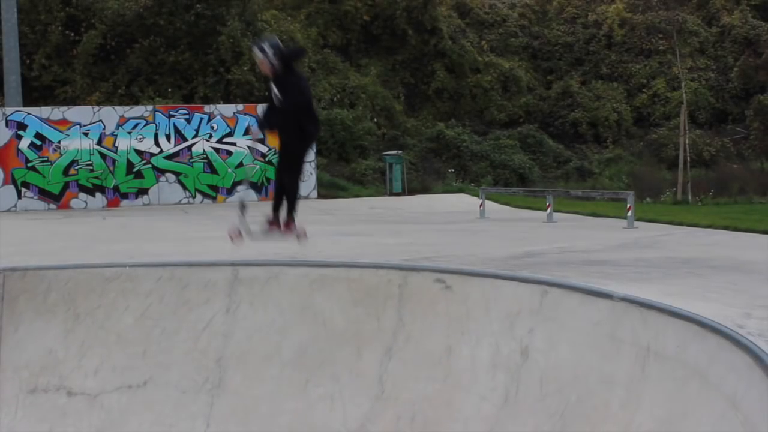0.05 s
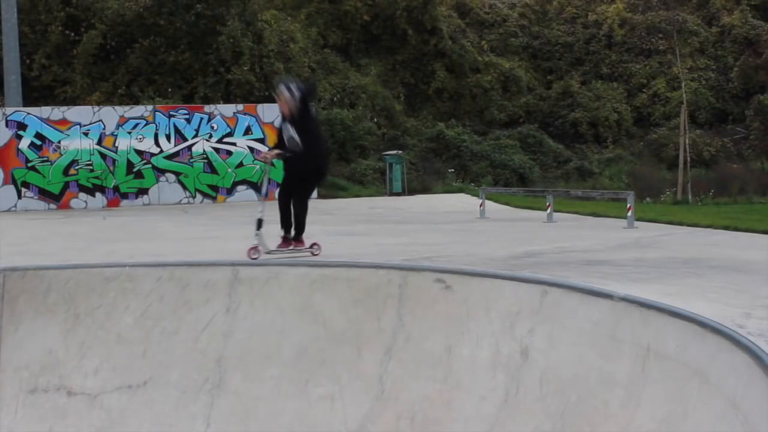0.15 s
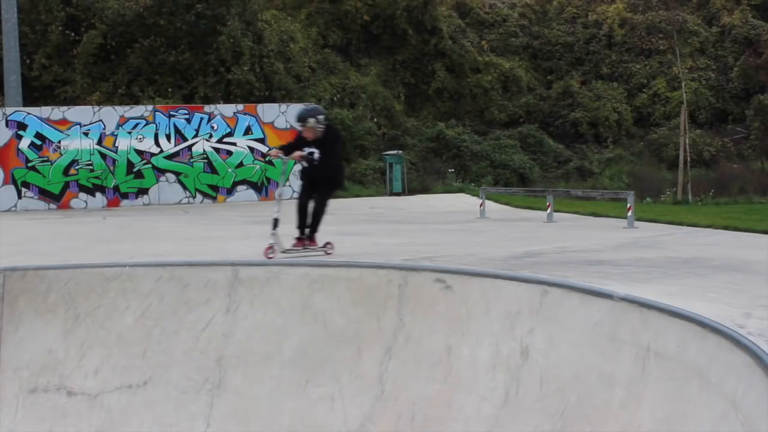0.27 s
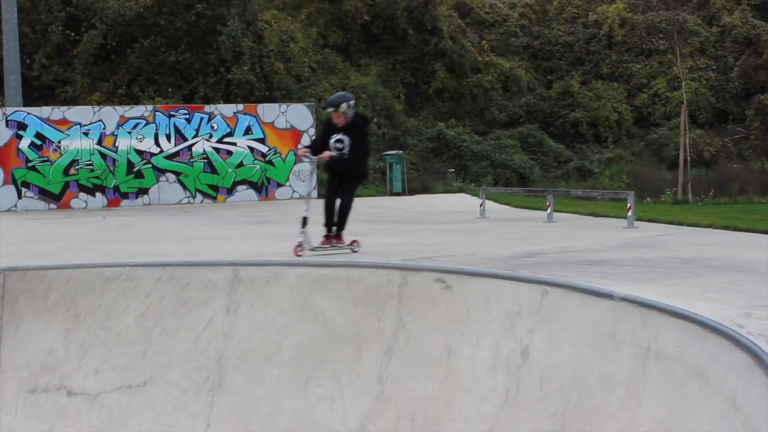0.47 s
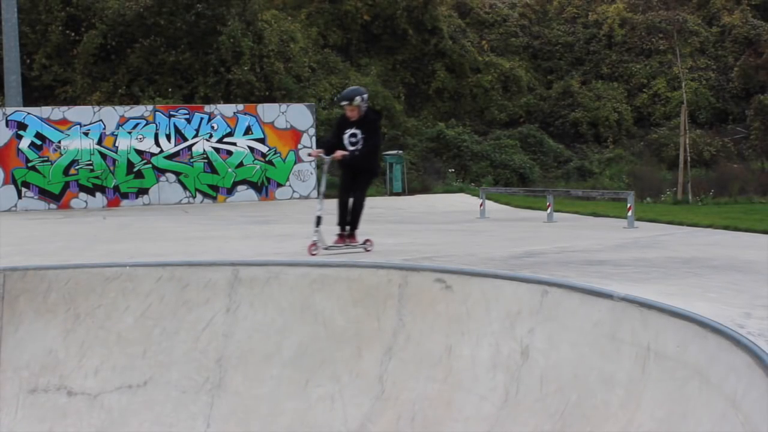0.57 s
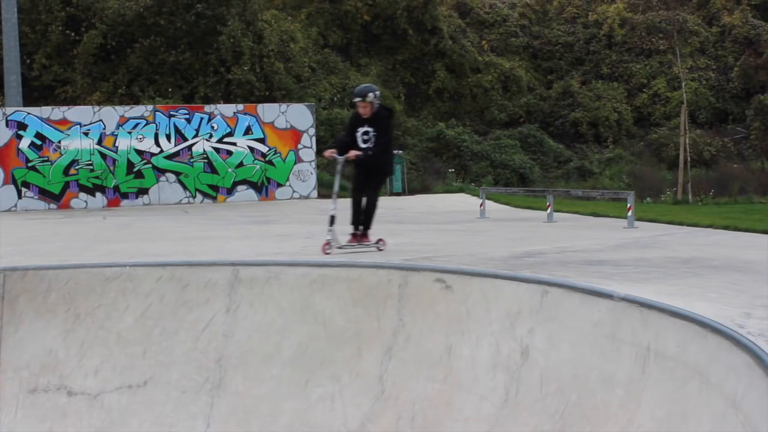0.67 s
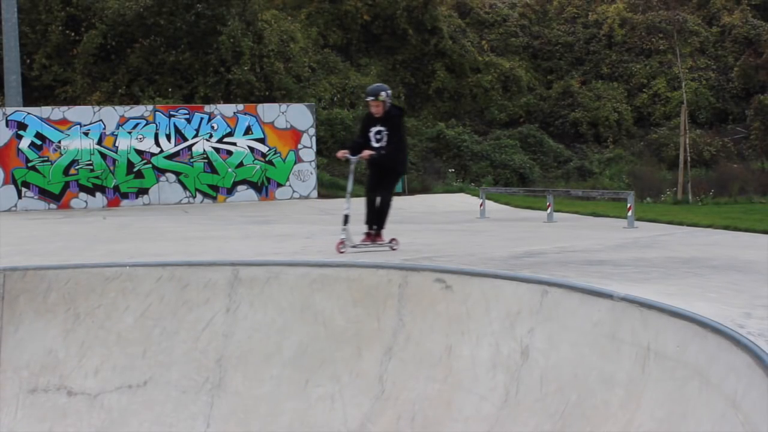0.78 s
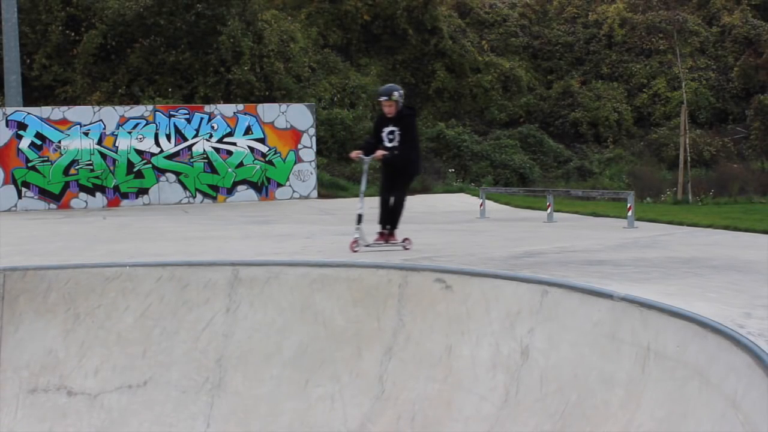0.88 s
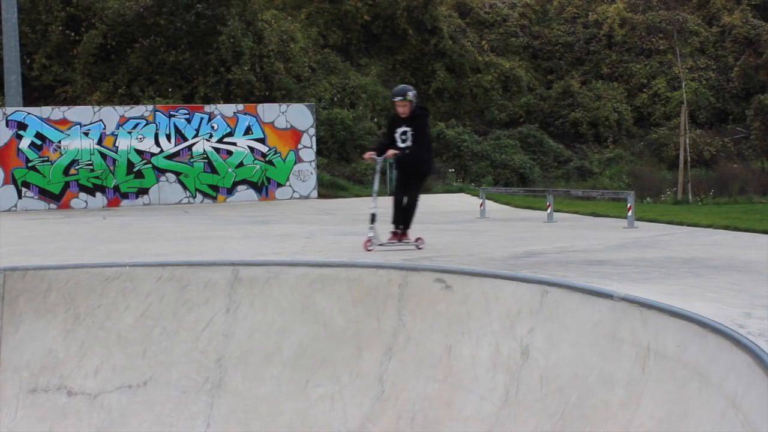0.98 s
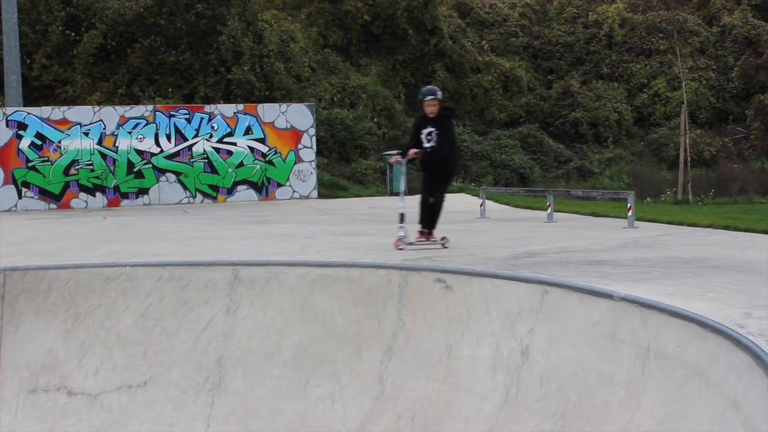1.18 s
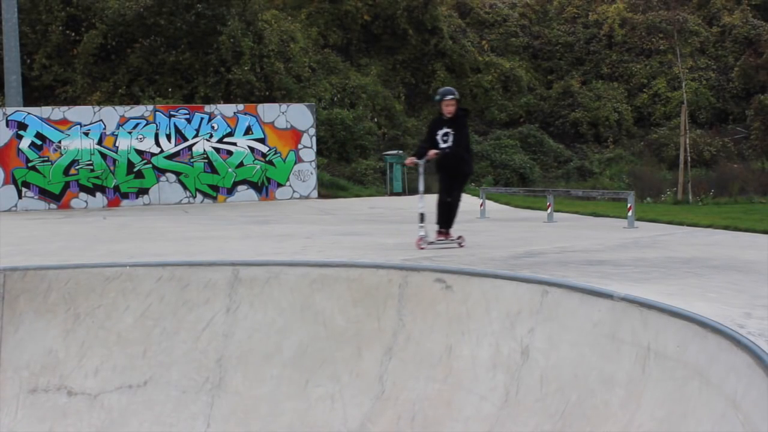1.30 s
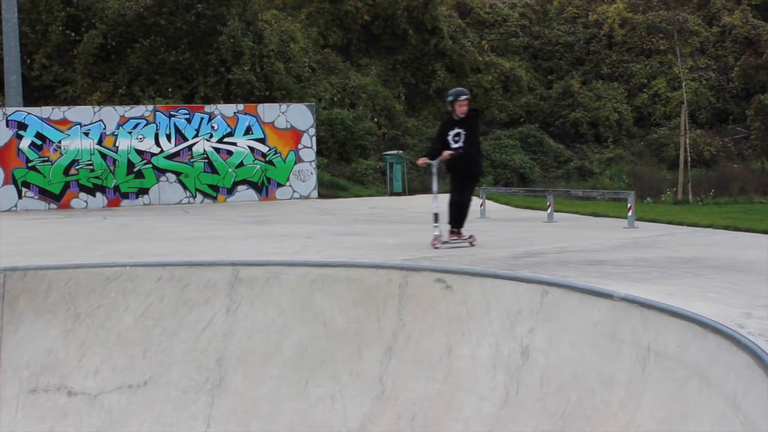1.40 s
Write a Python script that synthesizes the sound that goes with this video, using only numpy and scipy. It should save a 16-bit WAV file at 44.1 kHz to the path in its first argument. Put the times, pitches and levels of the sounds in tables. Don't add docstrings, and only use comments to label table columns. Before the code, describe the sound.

A stunt scooter slaps down on skatepark concrete, rear wheel then front, in a hard metallic double clack with a short bowl echo, then rolls with gritty hiss and soft knocks over faint distant traffic.

```python
import sys
import numpy as np
from scipy import signal
from scipy.fft import rfft, irfft, next_fast_len
from scipy.io import wavfile
from scipy.ndimage import uniform_filter1d, map_coordinates

SR = 44100
rng = np.random.default_rng(int(sys.argv[2]) if len(sys.argv) > 2 else 0)


def log_audio(samples):
    frames = np.atleast_2d(samples).T
    limited = np.clip(frames, -1, 1)
    pcm = np.round(limited * 32767).astype(np.int16)
    wavfile.write(sys.argv[1], SR, pcm)


def level_to_linear(level):
    exponent = np.asarray(level, float) / 20
    return 10 ** exponent


N = 63945


def unit(x):
    return x / np.sqrt(np.mean(x ** 2) + 1e-20)


def along(points, hz):
    f, v = np.transpose(points)
    return np.interp(np.log(hz + 1), np.log(f + 1), v)


def curves(rows):
    s, *cols = np.transpose(rows)
    return [np.interp(np.arange(N) / SR, s, c) for c in cols]


def wobble(rate_hz):
    knots = rng.standard_normal(int(N * rate_hz / SR) + 4)
    return map_coordinates(knots, [np.arange(N) * rate_hz / SR])


def filtered(x, response):
    m = next_fast_len(N + SR // 2)
    return irfft(rfft(x, m) * response(np.fft.rfftfreq(m, 1 / SR)), m)[..., :N]


def dulled(x, top_hz):
    return filtered(x, lambda hz: 1 / (1 + 1j * hz / top_hz))


def coloured(x, spectrum):
    return unit(filtered(x, lambda hz: level_to_linear(along(spectrum, hz))))


def resonance(hz, width_hz):
    return lambda f: 1j * f * width_hz / (hz ** 2 - f * f + 1j * f * width_hz)


def patchy(spectrum, patchy_db):
    z = signal.stft(rng.standard_normal(N), nperseg=512)[2]
    field = uniform_filter1d(rng.standard_normal(z.shape), 6, 0)
    field = uniform_filter1d(field, 10, 1)
    x = signal.istft(z * level_to_linear(patchy_db * unit(field)), nperseg=512)[1][:N]
    return coloured(x, spectrum)


def ringing(mode_hz, modes):
    t = np.arange(SR // 4) / SR
    out = np.zeros(len(t))
    for k, (hz, (db, t60_s)) in enumerate(zip(mode_hz, modes)):
        out += (-1) ** k * level_to_linear(db - 60 * t / t60_s) * np.sin(2 * np.pi * hz * t)
    return out


def bursts(times_s, levels_db, t60_s):
    t, out = np.arange(SR // 16) / SR, np.zeros(N + SR)
    rise_s = min(0.0006, t60_s / 20)
    envelope = level_to_linear(-60 * t / t60_s) * (1 - np.exp(-t / rise_s))
    for s, db, noise in zip(times_s, levels_db, rng.standard_normal((len(times_s), len(t)))):
        push = noise * envelope
        out[round(s * SR):][:len(t)] += level_to_linear(db) * push / np.linalg.norm(push)
    return out[:N]


def smalls(rows, spread):
    t, out = np.arange(SR // 6) / SR, np.zeros(N + SR)
    for (s, db, hz, t60_s), near in zip(rows, rng.standard_normal((len(rows), 3))):
        detune = 1 + spread * near[:, None] * [[0], [1], [1]]
        ring = np.sin(2 * np.pi * hz * detune * t).sum(0)
        rise = 1 - np.exp(-t * hz / 1.67)
        out[round(s * SR):][:len(t)] += level_to_linear(db - 60 * t / t60_s) * rise * ring
    return out[:N]


def struck(s, levels_db, response):
    pushes = np.bincount(np.round(s * SR).astype(int), level_to_linear(levels_db), N)
    return signal.fftconvolve(pushes, response)[:N]


def concrete_crack(s, crack_db):
    # hz, level_db
    crack_spectrum = [(250, -32), (550, 7), (1000, -24), (1550, -3), (2430, -10), (3500, -7), (4300, -12.5),
                      (6000, -14), (12300, -18.5), (16200, -29.5)]
    dull = dulled(bursts(s, crack_db + 15.5, t60_s=0.018), top_hz=7760)
    snap = bursts(s, 1.6 * crack_db + 18, t60_s=0.0034)
    grid_hz = np.linspace(0, SR / 2, 65)
    gain = level_to_linear(2 * along(crack_spectrum, grid_hz))
    colour = signal.minimum_phase(signal.firwin2(255, np.linspace(0, 1, 65), gain))
    return signal.fftconvolve(dull + snap, colour / np.linalg.norm(colour))[:N]


def landing(contacts, metal_hz, metal):
    deck_hz = [295, 385, 528, 605, 745, 812]
    # level_db, t60_s
    deck = [(-17, 0.22), (5.5, 0.025), (9.5, 0.019), (5, 0.032), (-2.5, 0.027), (-3.5, 0.02)]
    s, metal_db, deck_db, crack_db = np.transpose(contacts)
    ring = struck(s, metal_db - 3.0, ringing(metal_hz, metal))
    thud = struck(s, deck_db - 9.0, ringing(deck_hz, deck))
    return np.array([ring, thud + concrete_crack(s, crack_db)])


def rear_landing():
    # start_s, metal_db, deck_db, crack_db
    rear_contacts = [(.2003, -28, -51, -24.5), (.2017, -29, -44, -26), (.2028, -3.5, -22.5, -10.5),
                     (.2049, -14, -18.5, -7), (.2076, -15.5, -16, -9.5), (.2095, -13, -22, -17),
                     (.2115, -14.5, -10.5, -14.5), (.2140, -16, -29, -14), (.2160, -28, -14, -13),
                     (.2215, -27, -30, -18), (.2250, -24, -31, -27.5), (.2285, -52, -26.5, -52),
                     (.2340, -51, -21.5, -29), (.2380, -51, -26, -45), (.2415, -26, -16.5, -42)]
    rear_hz = [1427, 1779, 2043, 3009, 3305, 3582, 4050, 5150, 6030, 8300]
    # level_db, t60_s
    rear_metal = [(-1.5, 0.038), (-9, 0.03), (-3, 0.01), (-3, 0.014), (-6, 0.033), (-9, 0.018),
                  (-8.5, 0.033), (-24, 0.011), (-23, 0.007), (-19, 0.024)]
    return landing(rear_contacts, rear_hz, rear_metal)


def front_landing():
    # start_s, metal_db, deck_db, crack_db
    front_contacts = [(.2608, -34, -55, -21), (.2624, -2.5, -16, -23), (.2652, -43, -27, -16),
                      (.2662, -44, -32, -8.5), (.2690, -23, -39, -25), (.2725, -31, -39, -17.5),
                      (.2755, -41, -23.5, -22), (.2785, -43, -22, -32), (.2825, -48, -28, -25),
                      (.288, -29, -38, -32), (.295, -40, -41, -34), (.301, -42, -45, -42),
                      (.3205, -47, -28, -35), (.3585, -38, -35, -42), (.365, -34, -34, -52)]
    front_hz = [1052, 1453, 1660, 1800, 2955, 3295, 4145, 4441, 5464, 6008, 8043]
    # level_db, t60_s
    front_metal = [(-11.5, 0.071), (-2.5, 0.061), (8, 0.012), (4.5, 0.0087), (-11.5, 0.033), (-15, 0.031),
                   (-12.5, 0.041), (-15, 0.043), (-17, 0.033), (-14, 0.026), (-14, 0.038)]
    return landing(front_contacts, front_hz, front_metal)


def deck_flex():
    # start_s, level_db, pitch_hz, t60_s
    flex = [
        (.203, -22.5, 381, 0.072),
        (.2085, -19, 528, 0.029),
        (.2095, -22, 807, 0.035),
        (.2150, -34, 725, 0.017),
        (.2160, -29, 412, .018),
        (.240, -37, 520, 0.026),
        (.262, -20.5, 789, 0.036),
        (.263, -27, 450, 0.053),
    ]
    return smalls(flex, spread=0.01)


def park(x):
    # delay_s, level_db
    echoes = [
        (0.026, -32),
        (.031, -30),
        (.038, -32),
        (.057, -32),
        (0.098, -38),
    ]
    # hz, t60_s
    yard = [(200, 0.74), (1000, 0.42), (5000, 0.61), (12000, 0.31)]
    delay_s, echo_db = np.transpose(echoes)
    early = 3 * dulled(bursts(delay_s, echo_db, t60_s=0.016), top_hz=1740)
    hz, t, z = signal.stft(rng.standard_normal(SR // 2), SR, nperseg=256)
    decay = level_to_linear(-60 * t / along(yard, hz)[:, None])
    tail = signal.istft(z * decay, SR, nperseg=256)[1]
    tail = np.pad(tail, (500, N))[:N]
    return signal.fftconvolve(x, early + level_to_linear(-22.5) * tail / np.linalg.norm(tail))[:N]


def wheels():
    # start_s, load_db
    roll = [(0, -61), (.2, -64), (.29, -41), (.4, -42.5), (.52, -49.5), (.6, -42), (.68, -44), (.74, -44),
            (.8, -39), (.85, -40.5), (.91, -41), (.96, -40), (1.02, -42.5), (1.06, -44.5), (1.075, -45),
            (1.12, -56), (1.25, -52), (1.45, -56.5)]
    # hz, level_db
    tyre = [(120, -51), (200, -10.5), (387, -8), (509, -2), (548, -19), (722, -4.5), (1840, -4),
            (3830, -10.5), (16000, -34.5)]
    grit_per_s, grit_db, grit_spread_db = 900, -9, 3
    load_db, = curves(roll)
    grains = (rng.random(N) < grit_per_s / SR) * rng.standard_normal(N)
    size_db = grit_spread_db * rng.exponential(size=N).clip(0, 3)
    grit = coloured(grains * level_to_linear(size_db), tyre)
    level = level_to_linear(load_db + 0.4 * wobble(14) + 0.8 * wobble(40))
    return level * unit(patchy(tyre, patchy_db=1) + level_to_linear(grit_db) * grit)


def ticks():
    # start_s, level_db, pitch_hz, t60_s, width_share (of pitch)
    tick_rows = [(.232, -39, 7950, 0.043, 0.14), (0.237, -43, 8400, 0.023, 0.073),
                 (0.234, -35, 4430, 0.11, 0.69), (0.25, -37.5, 7540, 0.06, 0.36),
                 (.046, -51.5, 5060, .03, .03), (.111, -53, 5000, 0.024, 0.037),
                 (0.328, -39.5, 5370, 0.049, 0.13), (.336, -48, 5300, .04, 0.12),
                 (0.346, -43, 5560, .04, .08), (0.2, -32, 4500, .01, .6), (.2135, -31, 3200, 0.011, 0.51),
                 (0.221, -31, 5540, 0.025, .4), (.2655, -25, 4000, 0.0039, .5),
                 (.2685, -16, 3420, 0.016, 0.93), (0.273, -23, 3530, 0.012, .5),
                 (.283, -36.5, 4560, .04, 0.35), (0.289, -45, 3260, 0.037, 0.22),
                 (0.934, -48, 8100, 0.0049, 0.65), (.996, -52, 6500, .005, 0.41),
                 (1.062, -68, 11700, .008, .2), (1.249, -54.5, 8450, 0.042, 0.33),
                 (1.33, -55, 6950, 0.09, 0.2), (1.356, -53, 7100, 0.056, 0.28),
                 (1.376, -54.5, 7000, .025, .25)]
    out = np.zeros(N)
    for s, db, hz, t60_s, share in tick_rows:
        puff = bursts([s], [db + 28.5 - 10 * np.log10(share)], t60_s)
        band = resonance(hz, hz * share)
        out += filtered(puff, lambda f: band(f) ** 2)
    return out


def knocks():
    # start_s, level_db, pitch_hz, t60_s
    knock_rows = [(.222, -22.5, 151.4, 0.048), (.268, -32, 149, 0.075), (.22, -34, 64, 0.15),
                  (.233, -28, 1660, 0.081), (.239, -44, 1660, .04), (.229, -32.5, 1054, 0.093),
                  (.287, -34, 978, 0.074), (.291, -35, 1820, 0.036), (.356, -36, 978, .05),
                  (.356, -36, 430, 0.033), (.385, -53, 997, 0.058), (.69, -45.5, 97, 0.13),
                  (.765, -39.5, 940, .04), (.829, -42.5, 343, 0.065), (.833, -41, 804, 0.022),
                  (.885, -36.5, 400, 0.031), (.905, -54, 1380, .08), (.945, -43, 1060, 0.079),
                  (.965, -42.5, 390, 0.068), (1.0, -46, 279, 0.047), (1.055, -35, 307, 0.014),
                  (1.26, -57, 93, 0.068), (1.34, -45, 96.6, 0.12)]
    return smalls(knock_rows, spread=0.038)


def road():
    # start_s, level_db
    passing = [(0, -41.5), (.2, -42), (.5, -45.5), (1.1, -45), (1.45, -45.5)]
    # hz, level_db
    traffic = [(25, -9), (55, -6.5), (130, -11), (250, -12), (600, -7), (1000, -8.5), (1900, -10.5),
               (2400, -17.5), (5000, -25.5), (16000, -39)]
    hollow = unit(filtered(rng.standard_normal(N), resonance(1000, width_hz=110)))
    level = level_to_linear(curves(passing)[0] + 0.8 * wobble(6.8))
    return level * (patchy(traffic, patchy_db=0.0) + level_to_linear(-8 + 1.1 * wobble(9.9)) * hollow)


def engine_drone():
    # start_s, pitch_hz, level_db
    drone = [
        (0, 140, -81),
        (.9, 130, -59),
        (1.05, 131.2, -54.5),
        (1.17, 142, -48),
        (1.26, 133.5, -57.5),
        (1.45, 130.6, -59),
    ]
    hz, db = curves(drone)
    level = level_to_linear(db + 0.5 + 1.2 * wobble(11.5))
    phase = 2 * np.pi * np.cumsum(hz * (1 + 0.022 * wobble(23.9))) / SR
    return level * np.sin(phase)


def free_wheel():
    # start_s, level_db
    whine = [
        (0, -52),
        (.13, -53),
        (.19, -60),
        (.3, -80),
        (1.45, -80),
    ]
    whine_hz, width_hz = 772, 14
    drift = np.sqrt(2 * np.pi * width_hz / SR) * rng.standard_normal(N)
    phase = np.cumsum(2 * np.pi * whine_hz / SR + drift)
    return level_to_linear(curves(whine)[0]) * unit(np.sin(phase))


def lorry():
    # start_s, level_db
    nearing = [
        (0, -64),
        (.6, -62),
        (.92, -62),
        (1.0, -54),
        (1.45, -54),
    ]
    # hz, level_db
    rumble = [(25, -22), (55, -1.5), (130, -5.5), (200, -18), (400, -41)]
    return level_to_linear(curves(nearing)[0] + wobble(11.9)) * patchy(rumble, patchy_db=3.0)


def microphone_hiss():
    # hz, level_db
    hiss_spectrum = [(2000, -1), (8000, -17), (13000, 3.5), (15500, 5)]
    return level_to_linear(-60.5) * patchy(hiss_spectrum, patchy_db=1.0)


def scene():
    ring, blow = rear_landing() + front_landing()
    echo = park(level_to_linear(-13) * ring + blow)
    rolling = wheels()
    background = road() + engine_drone() + free_wheel() + lorry() + microphone_hiss()
    steady = filtered(rolling + background, lambda hz: hz < 15700)
    return (ring + blow + echo + steady + ticks() + knocks() + deck_flex())[None]


def low_pass(x):
    return signal.sosfilt(signal.butter(12, 16640, fs=SR, output="sos"), x)


def record(dry):
    low_cut_hz, ceiling, top_hz = 30, 1.05, 16500
    x = filtered(dry, lambda hz: (1j * hz / (low_cut_hz + 1j * hz)) ** 2)
    x = x / (1 + np.abs(x / ceiling) ** 4) ** 0.25
    mix = filtered(x, lambda hz: hz < top_hz)
    return low_pass(mix)


dry = scene()
out = record(dry)
log_audio(out)
```